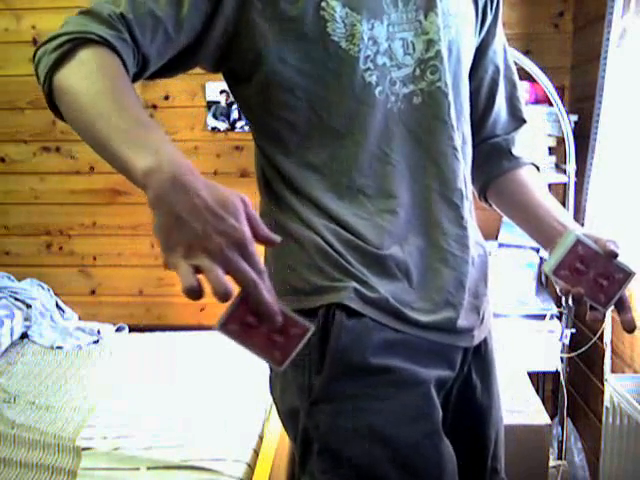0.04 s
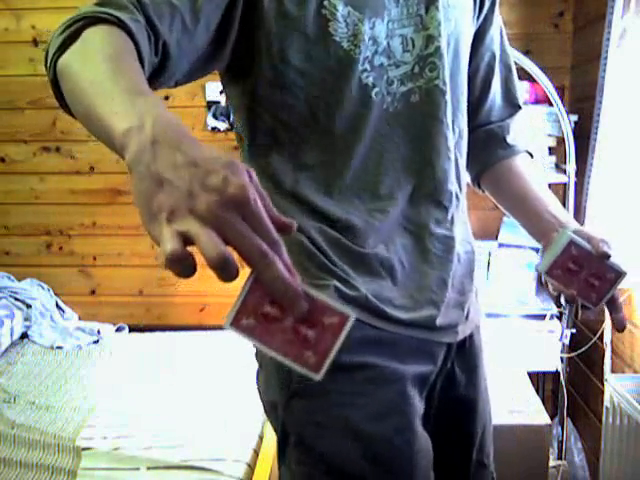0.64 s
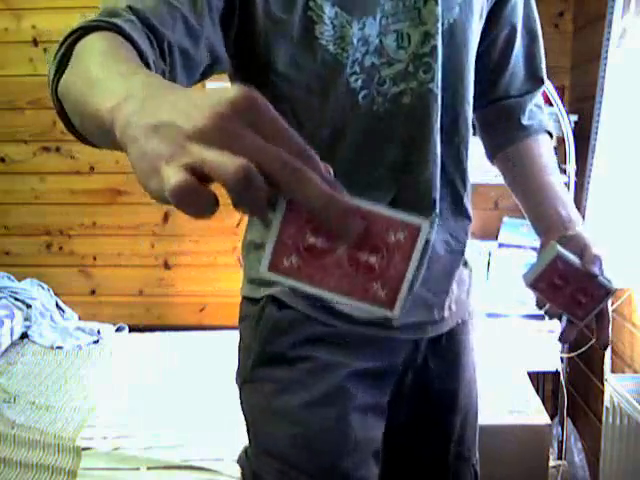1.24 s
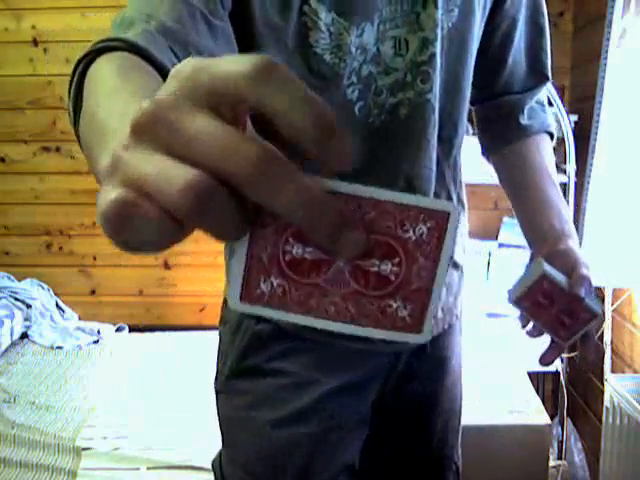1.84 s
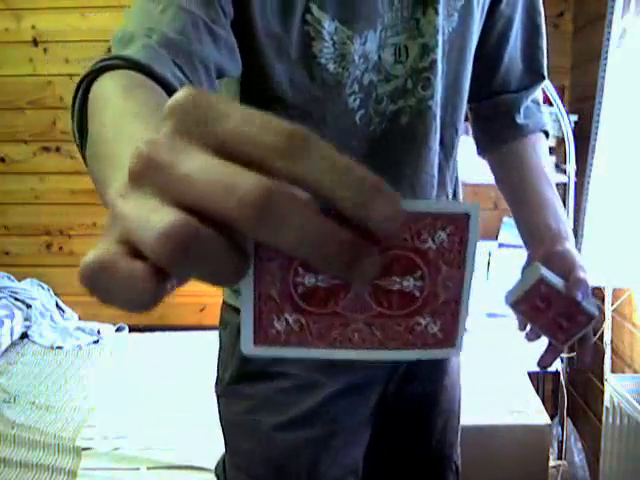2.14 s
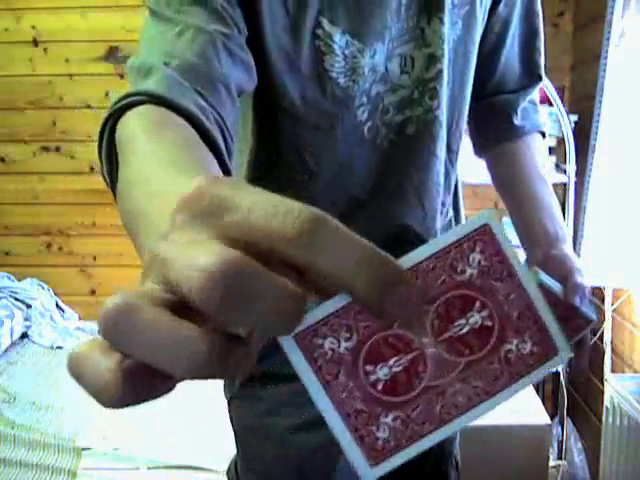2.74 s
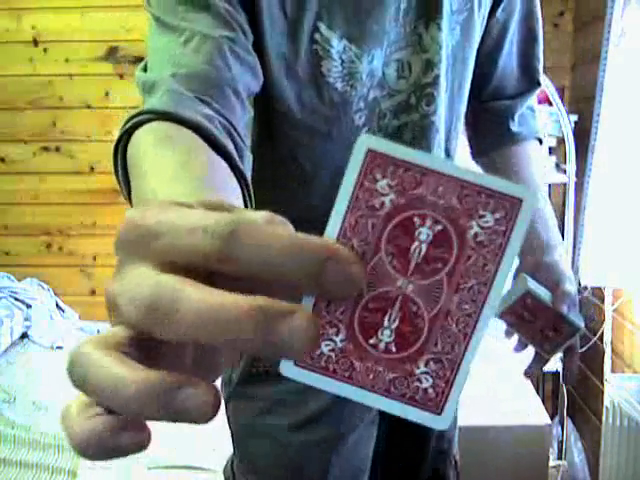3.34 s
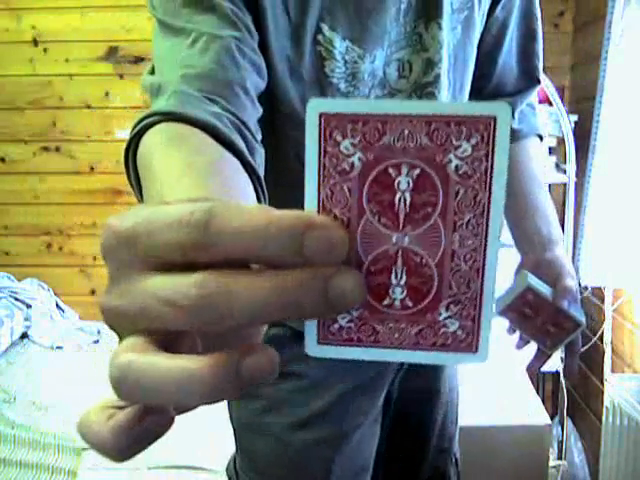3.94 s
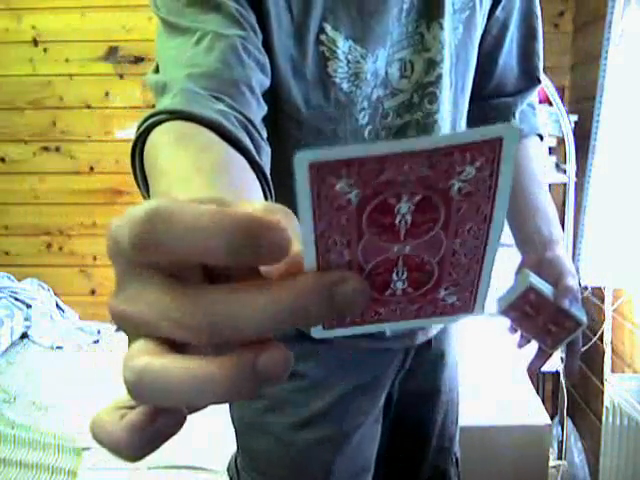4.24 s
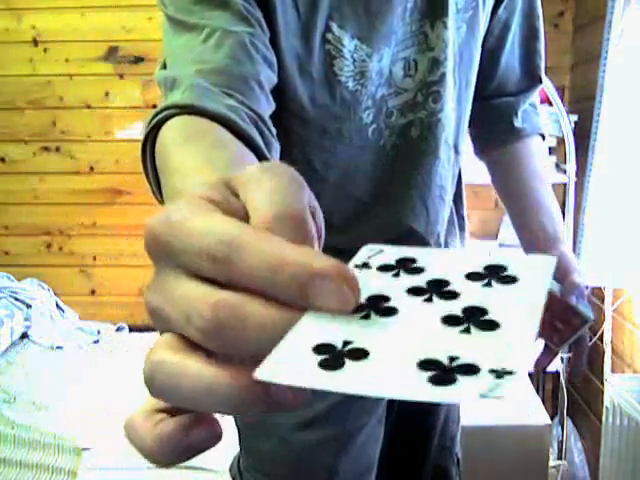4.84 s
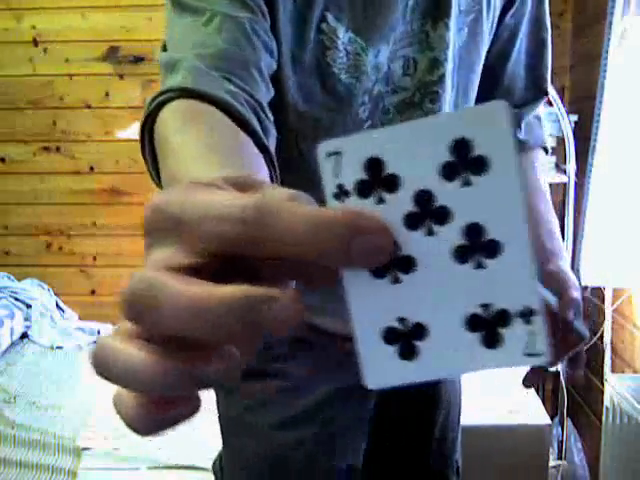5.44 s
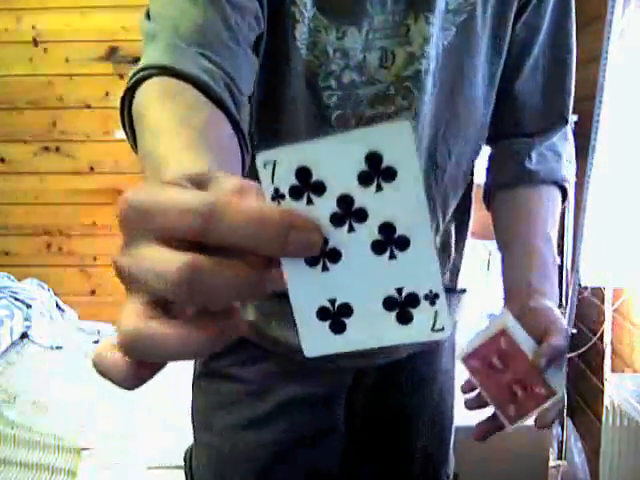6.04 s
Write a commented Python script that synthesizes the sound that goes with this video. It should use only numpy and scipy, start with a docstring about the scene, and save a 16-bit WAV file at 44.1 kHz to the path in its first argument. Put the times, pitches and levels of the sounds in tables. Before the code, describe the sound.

In a small quiet room, steady hiss and the faint rustle and rumble of a moving arm surround a playing card handled near the microphone. The card first scrapes and ticks lightly on skin, then gives two crisp, dry snaps, each flapping against the fingers. Very faint high chirps and a small click fill the gap before one last sharp snap.

```python
"""A quiet wooden room: a playing card is twirled and snapped between the fingers near a small microphone.
Before each snap the bent card scrapes along the skin and slips in quick jerks that ring its stiff edge;
then its face flaps against the fingers. Light ticks and faint thin chirps lie between the snaps,
over steady hiss, sleeve rustle and the soft low rumble of the moving arm."""
import sys
import numpy as np
from scipy import signal
from scipy.fft import rfft, irfft
from scipy.io import wavfile
from scipy.ndimage import uniform_filter1d

SR = 44100
rng = np.random.default_rng(int(sys.argv[2]) if len(sys.argv) > 2 else 0)


def store_pcm(level_fs):
    """Save levels as 16-bit WAV."""
    pcm = np.round(np.clip(level_fs, -1, 1) * 32767).astype(np.int16)
    wavfile.write(sys.argv[1], SR, np.atleast_2d(pcm).T)


N = 273420
TIME = np.arange(N) / SR

# card on skin: start t/s, firmest grip t/s, end t/s, top level/dB, build-up exponent,
# bend tone at firmest f/Hz, climb/(octave/s), bend tone level/dB re edge noise
STROKES = [(1.787, 1.815, 1.89, -54, 0.89, 5250, 3.5, 4), (1.829, 1.8547, 1.88, -43, .4, 3300, 8, -3.5),
           (2.265, 2.278, 2.350, -58, 1, 5335, 0.83, 0), (2.573, 2.619, 2.614, -44.5, 1.14, 3950, 13, -9),
           (3.078, 3.120, 3.136, -23.5, 1.5, 3883, 92, -4), (4.432, 4.442, 4.543, -51, 1, 4890, 0.79, 4),
           (5.272, 5.305, 5.39, -34.5, 1.07, 3170, 3.5, -8)]
# stiff edge spectrum: f/Hz, level/dB
EDGE_SPECTRUM = [(300, -44), (900, -30.5), (1700, -18), (2300, -17.5), (3200, -5.5), (4000, -4.5),
                 (4900, 5.5), (5500, 0.5), (6300, -9), (7200, -15), (8000, -32)]
FREE_HZ, SING_HZ = 1820, 5400  # card's lowest bending mode; ring of its rubbed edge
STICK_DB = -45.5  # a louder scrape breaks into jerks
# faint tone kinds: start f/Hz, end f/Hz, width/Hz, length/s
LOW_CHIRP, MID_CHIRP = (4170, 4400, 230, .14), (4780, 5200, 640, .13)
HIGH_CHIRP, WHISTLE = (6330, 6050, 250, .1), (3100, 3200, 100, .28)
SOFT_SWISH, THIN_SWISH = (680, 1200, 400, .12), (1600, 1700, 400, .13)
HOLLOW = (630, 660, 190, .055)


def amp(db):
    """Decibels to gain."""
    return 10 ** (np.asarray(db) / 20)


def unit(x):
    """Scale to rms 1."""
    return x / np.sqrt(np.mean(x ** 2) + 1e-20)


def read(points, hz):
    """Interpolate on a log-frequency axis."""
    f, value = np.transpose(points)
    return np.interp(np.log(hz + 1), np.log(f + 1), value)


def add(mix, at_s, sound):
    """Mix a sound in at at_s."""
    part = mix[max(round(at_s * SR), 0):][:len(sound)]
    part += sound[:len(part)]


def noise(spectrum, count, top_hz=SR):
    """Coloured noise, rms 1, rolled off above top_hz."""
    hz = np.fft.rfftfreq(count, 1 / SR)
    rolloff = 1 / np.sqrt(1 + (hz / top_hz) ** 6)
    return unit(irfft(rfft(rng.standard_normal(count)) * amp(read(spectrum, hz)) * rolloff, count))


def fuzzy_tone(hz, width_hz):
    """Narrowband noise along the curve hz, rms 1."""
    pole = np.exp(-np.pi * width_hz / SR)
    white = rng.standard_normal((2, len(hz) + SR // 10))
    a, b = signal.lfilter([1], [1, -2 * pole, pole * pole], white)[:, -len(hz):]
    phase = 2 * np.pi * np.cumsum(hz) / SR
    return unit(a * np.cos(phase) + b * np.sin(phase))


def burst(t, rise_s, fade_s):
    """Quick swell, exponential fade, peak 1."""
    shape = (1 - np.exp(-(t / rise_s) ** 2)) * np.exp(-t / fade_s)
    return shape / shape.max()


def wander(top_hz):
    """Slow random drift, rms 1."""
    hz = np.geomspace(.4, top_hz, num=16)[:, None]
    t = np.linspace(0, N / SR, num=800)
    drift = (np.sin(2 * np.pi * (hz * t + rng.random(hz.shape))) / np.sqrt(hz)).sum(0)
    return np.interp(TIME, t, unit(drift))


def background(hiss_db=-67.81, waver_db=2.5):
    """Even hiss with a few narrow, wavering resonances."""
    # f/Hz, relative level/dB
    hiss_spectrum = [(15, -29.5), (25, 3), (54, -1), (70, -11), (134, -8.5), (202, -14.5), (581, -9),
                     (832, -11.5), (1110, -14), (2070, -19.5), (2390, -21.5), (3040, -24), (4360, -21.5),
                     (5160, -17.5), (7760, -36.5), (10100, -66), (17100, -120)]
    # f/Hz, width/Hz, rms level/dB
    resonances = [(597, 56, -79), (3110, 83, -85.5), (4990, 320, -82), (5410, 67, -86)]
    hums = sum(amp(db + waver_db * wander(5.1)) * fuzzy_tone(np.full(N, hz), width_hz)
               for hz, width_hz, db in resonances)
    return amp(hiss_db) * noise(hiss_spectrum, N) + hums


def arm_movement(trim_db=-1, lumpy_db=1.5):
    """The moving arm: low rumble, soft bumps, sleeve rustle."""
    # t/s, level/dB before trim
    rumble_curve = [(0.0, -68), (0.28, -64.5), (0.52, -73), (1.03, -71), (1.38, -69), (2.07, -66.5),
                    (2.28, -69), (3.38, -70.5), (4.87, -75.5), (6.2, -76)]
    # t/s, level/dB, fade/s
    soft_bumps = [(0.074, -51.5, 0.13), (1.5, -61, .03), (5.84, -66.5, 0.07), (1.9, -61.5, .25)]
    # t/s, level/dB
    rustle_curve = [(0, -78), (.8, -81.5), (1.1, -73), (2.7, -71), (4.3, -73), (4.8, -77.5), (6.2, -77.5)]
    # spectra of rustle, rumble and bumps: f/Hz, level/dB
    cloth = [(100, -5.5), (190, 5.5), (300, 1.5), (550, 2.5), (950, 3), (2000, -8), (3800, -6.5), (5200, 1),
             (6500, -10), (8000, -29)]
    deep = [(20, -6.5), (32, -7.5), (47, 10), (70, -4.5), (100, -1.5), (140, -7), (190, -5),
            (300, -18.5), (600, -41.5), (2000, -72)]
    padded = [(20, 1.5), (45, 0), (70, -4), (100, .5), (150, -7), (210, -4), (300, -26),
              (600, -37), (2000, -70)]
    rumble = amp(np.interp(TIME, *np.transpose(rumble_curve)) + trim_db + lumpy_db * wander(15))
    bumps = np.zeros(N)
    for at_s, db, fade_s in soft_bumps:
        add(bumps, at_s, amp(db) * burst(TIME[:SR], .006, fade_s))
    rustle = amp(np.interp(TIME, *np.transpose(rustle_curve)))
    return rumble * noise(deep, N) + bumps * noise(padded, N) + rustle * noise(cloth, N)


def faint_tones(crest=.16, drone_s=(1.0, 2.5), drone_db=-78.5, drone_hz=187):
    """Short fuzzy glides that swell fast and fade slowly, and one low drone."""
    # t/s, level/dB, kind (start f/Hz, end f/Hz, width/Hz, length/s)
    glides = [(0, -70, LOW_CHIRP), (.1, -79, HIGH_CHIRP), (.435, -66, HOLLOW), (.45, -80, WHISTLE),
              (1.05, -68.5, SOFT_SWISH), (1.895, -63, HOLLOW), (3.315, -68, LOW_CHIRP),
              (3.51, -64.5, MID_CHIRP), (3.655, -79, HIGH_CHIRP), (3.772, -61, LOW_CHIRP),
              (3.99, -63, MID_CHIRP), (4.1, -73.5, HIGH_CHIRP), (4.2, -64.5, MID_CHIRP),
              (4.28, -70.5, THIN_SWISH)]
    out = np.zeros(N)
    for at_s, db, (from_hz, to_hz, width_hz, length_s) in glides:
        progress = np.linspace(0, 1, round(length_s * SR))
        swell = np.interp(progress, [0, crest, 1], [0, 1, 0])
        add(out, at_s, amp(db) * swell * fuzzy_tone(from_hz + (to_hz - from_hz) * progress, width_hz))
    start_s, end_s = drone_s
    count = round((end_s - start_s) * SR)
    drone = fuzzy_tone(np.full(count, drone_hz), width_hz=33)
    add(out, start_s, amp(drone_db) * signal.windows.tukey(count, .7) * drone)
    return out


def stroke(t, start_s, firmest_s, end_s, top_db, curve, firmest_hz, octaves_per_s):
    """Scrape level and bend tone: the grip builds and lets go; pitch climbs as the free part shortens."""
    touch_db, let_go_db = -58, -74
    grip = np.interp(t, [start_s, firmest_s], [0, 1]) ** curve
    release = np.interp(t, [firmest_s, end_s], [0, 1])
    db = touch_db + (top_db - touch_db) * grip + (let_go_db - top_db) * release
    bend_hz = firmest_hz * 2 ** (octaves_per_s * (t - firmest_s))
    return db, np.clip(bend_hz, 1.2 * FREE_HZ, SING_HZ)


def scrapes(grain_db=1.5, grain_s=.0017, sing_db=-6, free_db=-13.5):
    """Grainy friction rings the edge and the bend tone; a light grip weakens the lowest mode."""
    out = np.zeros(N)
    for *motion, bend_db in STROKES:
        start_s, _, end_s, top_db = motion[:4]
        count = max(round((end_s - start_s) * SR), SR // 200)
        db, bend_hz = stroke(start_s + TIME[:count], *motion)
        grain = unit(uniform_filter1d(rng.standard_normal(count), round(grain_s * SR)))
        edge = noise(EDGE_SPECTRUM, count)
        sing = amp(sing_db) * fuzzy_tone(np.full(count, SING_HZ), width_hz=700)
        light_grip_db = .2 * max(STICK_DB - top_db, 0)
        free = amp(free_db - light_grip_db) * fuzzy_tone(np.full(count, FREE_HZ), width_hz=300)
        bend = amp(bend_db) * fuzzy_tone(bend_hz, width_hz=430)
        rub = unit((edge + sing + free + bend) * amp(grain_db * grain))
        add(out, start_s, amp(db) * signal.windows.tukey(count, .08) * rub)
    return out


def slip(db, ring_hz, ring_s, hardness_db, flex_hz, rise_s=.00027, overtone=1.48, overtone_db=-8):
    """A slip rings the edge, cracks and flexes the card in two modes; hardness raises crack and flex."""
    t = TIME[:SR // 20]
    ring = burst(t, rise_s, ring_s) * np.sin(2 * np.pi * ring_hz * t)
    phase = 2 * np.pi * flex_hz * t
    modes = np.sin(phase) + amp(overtone_db) * np.sin(overtone * phase)
    flex = burst(t, rise_s, fade_s=.0022) * modes
    shape = burst(t, rise_s, fade_s=(.0026 + ring_s) / 2)
    crack = unit(shape * noise(EDGE_SPECTRUM, len(t))) * np.sqrt(np.mean(shape ** 2))
    flex_db, crack_db = .83 * hardness_db - 7.5, hardness_db - 6  # re ring
    return amp(db) * (ring + amp(flex_db) * flex + amp(crack_db) * crack)


def jerks(ring_hz=5130, detune=.023, every_s=.0044, jitter_s=.0002, growth=1.5858, fall_db=3, count=6):
    """Stick-slip under a firm grip: a quick run of slips growing up to the firmest moment."""
    out = np.zeros(N)
    for *motion, _ in STROKES:
        _, firmest_s, _, top_db = motion[:4]
        for k, (late, sharp) in enumerate(rng.standard_normal((count, 2))):
            at_s = firmest_s - k * every_s + jitter_s * late  # k counts backwards
            scrape_db, bend_hz = stroke(at_s, *motion)
            if scrape_db > STICK_DB:
                db = STICK_DB + growth * (top_db - STICK_DB) - fall_db * k * (k + 1) / 2
                hz = ring_hz * (1 + detune * sharp)
                add(out, at_s, slip(db, hz, ring_s=.0032, hardness_db=-12, flex_hz=bend_hz))
    return out


def snaps():
    """The edge slips free: light ticks to full snaps."""
    # t/s, ring level/dB, ring f/Hz, ring fade/s, hardness/dB, flex f/Hz
    slips = [(1.8568, -38, 4460, 0.004, -4, 1780), (2.2016, -50.5, 4000, 0.0016, 3.5, 2450),
             (2.2776, -49, 5500, 0.0055, -16, 3980), (2.3865, -52, 5520, .0076, 3.5, 4030),
             (2.6222, -14, 5070, 0.00088, -1.5, 1757), (2.6267, -19.5, 5190, 0.0017, -2, 4000),
             (3.1248, -11.5, 6010, .0019, -4.5, 4400), (3.623, -54.5, 4210, 0.0023, 1, 5380),
             (4.276, -55.5, 3880, .0037, 11, 1590), (4.4349, -37.5, 4790, 0.0038, -0.5, 2490),
             (5.2018, -35.5, 4610, 0.0019, -4, 1726), (5.3150, -20.5, 4670, 0.002, -24, 3150),
             (5.3173, -14, 4910, 0.0019, -3.5, 5800)]
    out = np.zeros(N)
    for at_s, *snap in slips:
        add(out, at_s, slip(*snap))
    return out


def flaps(rise_s=.0007, push_cycles=.7, leak_hz=70):
    """The card's face slaps skin and pushes a puff of air; deep bass leaks round its edges."""
    # t/s, slap level/dB, cutoff f/Hz, push level/dB, push f/Hz, settling time/s, change by then/dB
    landings = [(2.6273, -40.5, 520, -40.5, 163, .040, -3.5),
                (3.1268, -19.5, 2600, -20.5, 154.8, .030, -10.5), (5.3208, -30, 1550, -26, 140, .027, -4)]
    # land, rebound, settle: settling share, slap offset/dB, fade/s, cutoff ratio,
    # push offset/dB, push frequency ratio
    beats = [(0, 0, 0.0047, 1, 0, 1), (.25, -1, .0065, .9, -6.5, 2.9), (1, -1.5, .0075, 0.59, -0.5, 1.2)]
    # f/Hz, level/dB
    face_spectrum = [(30, -18.5), (60, -16), (125, 3), (220, -4.5), (310, -17), (450, 4.5), (650, -13),
                     (820, -12), (1100, -4.5), (1750, -3.5), (2300, -10), (3000, -7), (7000, -13)]
    out, t = np.zeros(N), TIME[:SR // 10]
    for at_s, slap_db, top_hz, push_db, push_hz, settle_s, change_db in landings:
        for share, beat_db, fade_s, top_ratio, push_ratio, puff_db in (
                (a, b, c, d, f, e) for a, b, c, d, e, f in beats):
            shape = burst(t, rise_s, fade_s)
            face = noise(face_spectrum, len(t), top_hz * top_ratio)
            slap = unit(shape * face) * np.sqrt(np.mean(shape ** 2))
            hz = push_hz * push_ratio
            push = -burst(t, rise_s, push_cycles / hz) * np.sin(2 * np.pi * hz * t)
            beat = amp(slap_db + beat_db) * slap + amp(push_db + puff_db) * push
            add(out, at_s + share * settle_s, amp(share * change_db) * beat)
    return signal.sosfilt(signal.butter(1, leak_hz, "highpass", fs=SR, output="sos"), out)


def room(x, build_s=.0061, wall_s=.022, wall_db=-25):
    """Short diffuse tail, one echo off the wooden wall, low standing waves."""
    # f/Hz, t60/s
    decay_times = [(80, 0.44), (200, 0.3), (500, 0.2), (1200, 0.31), (3000, 0.32), (5000, 0.17), (8000, .2)]
    # f/Hz, level/dB
    tail_spectrum = [(50, -14.5), (120, -9.5), (200, -7.5), (330, -11.5), (460, -2), (700, -9), (1200, -13),
                     (1700, -16.5), (3000, -14), (5000, -13), (8000, -14)]
    # f/Hz, t60/s, level/dB
    standing_waves = [(122, .15, -9.5), (185, 0.26, -8), (456, 0.1, -9)]
    count = SR // 2
    hz, frame_s, bins = signal.stft(rng.standard_normal(count), SR, nperseg=256)
    rate = np.log(1000) / read(decay_times, hz)[:, None]
    decay = np.exp(-rate * frame_s) * np.sqrt(2 * rate / SR)  # unit energy
    bins = bins * decay * amp(read(tail_spectrum, hz))[:, None]
    t = TIME[:count]
    tail = signal.istft(bins, SR)[1][:count] * (1 - np.exp(-(t / build_s) ** 2))
    tail[round(wall_s * SR)] += amp(wall_db)
    for mode_hz, t60_s, db in standing_waves:
        fade = np.exp(-np.log(1000) * t / t60_s)
        tail += amp(db) * 2 * fade / fade.sum() * np.cos(2 * np.pi * mode_hz * t)
    return signal.fftconvolve(x, tail)[:N]


def scene(scrape_send_db=2, tone_send_db=8):
    """Near, dry card and wetter faint tones over arm movement and hiss."""
    card = snaps() + jerks() + flaps()
    rubbing, tones = scrapes(), faint_tones()
    reverb = room(card + amp(scrape_send_db) * rubbing + amp(tone_send_db) * tones)
    return (card + rubbing + tones + reverb + arm_movement() + background())[None]


def record(dry, cutoff_hz=7750):
    """The microphone passes nothing above its speech band."""
    lowpass = signal.firwin(181, cutoff_hz, window=("kaiser", 8), fs=SR)
    return signal.oaconvolve(dry, lowpass[None], "same")


dry = scene()
out = record(dry)
store_pcm(out)
```